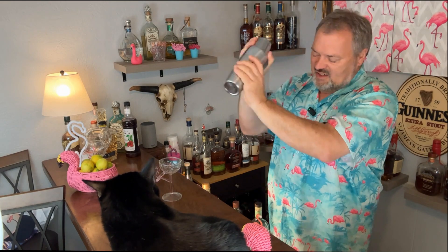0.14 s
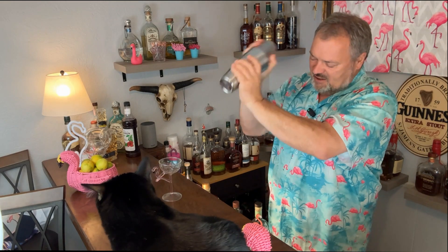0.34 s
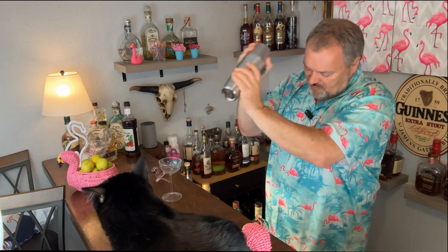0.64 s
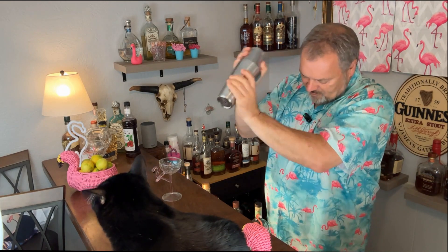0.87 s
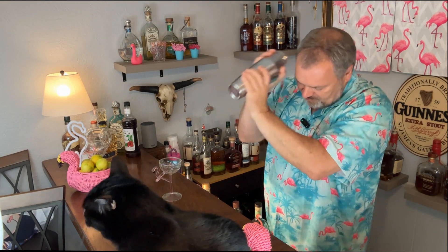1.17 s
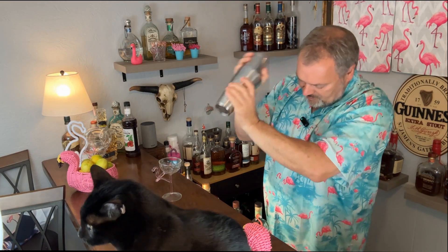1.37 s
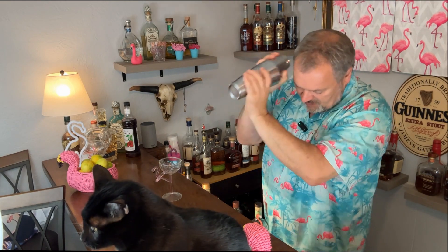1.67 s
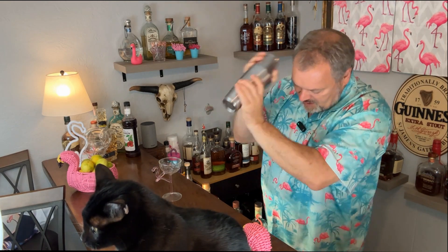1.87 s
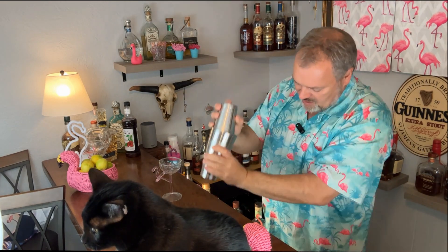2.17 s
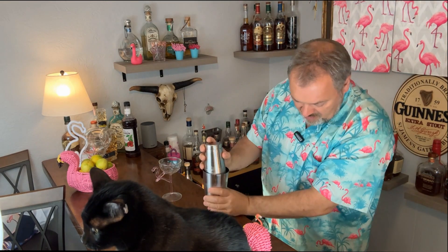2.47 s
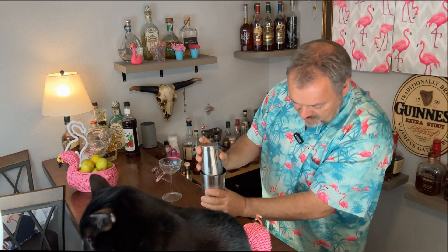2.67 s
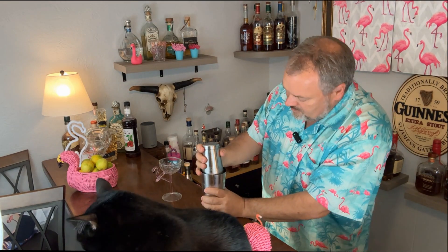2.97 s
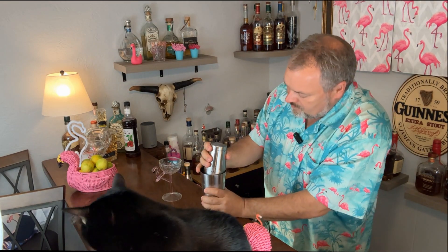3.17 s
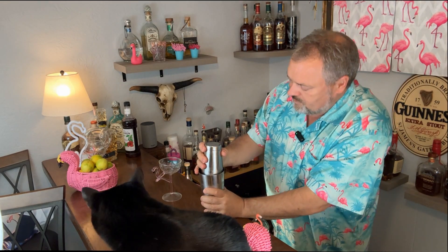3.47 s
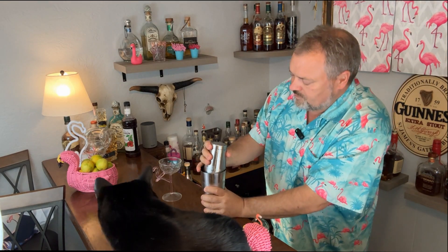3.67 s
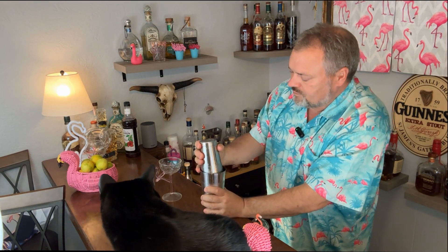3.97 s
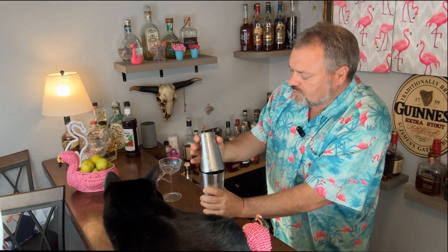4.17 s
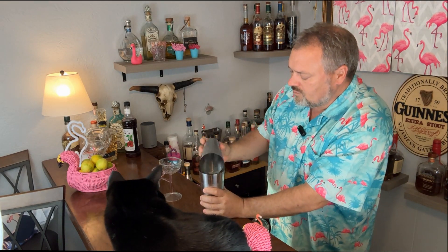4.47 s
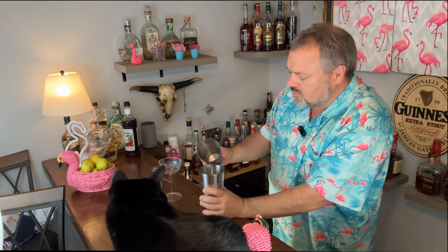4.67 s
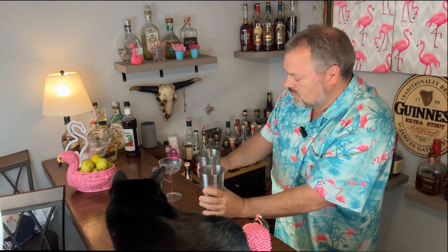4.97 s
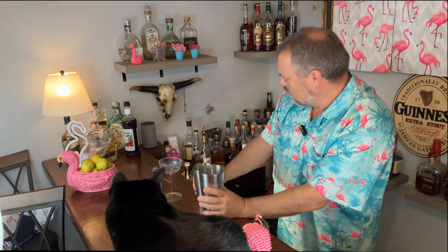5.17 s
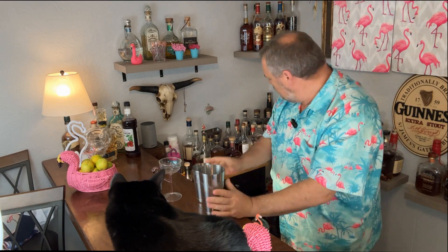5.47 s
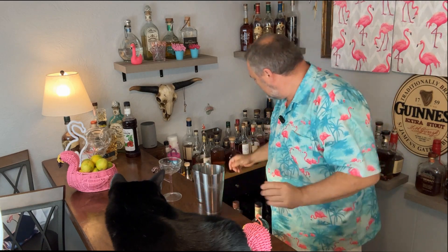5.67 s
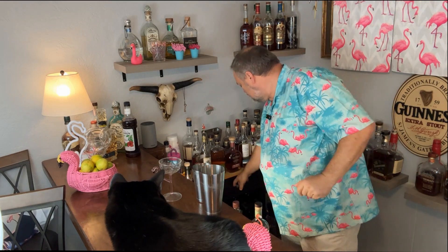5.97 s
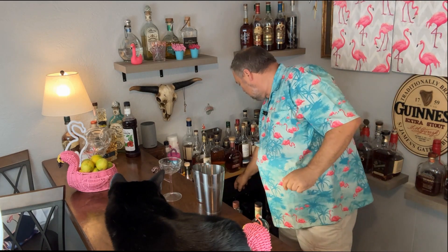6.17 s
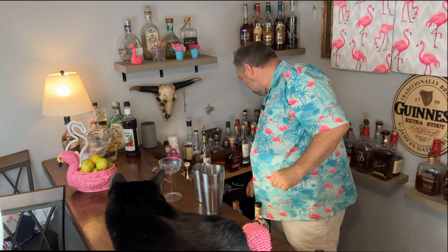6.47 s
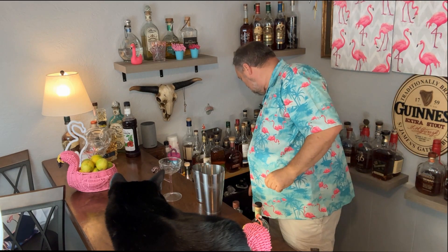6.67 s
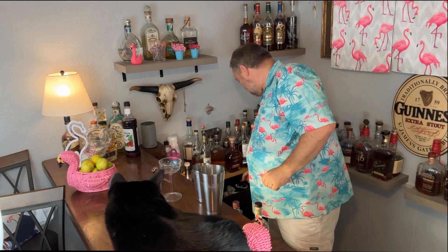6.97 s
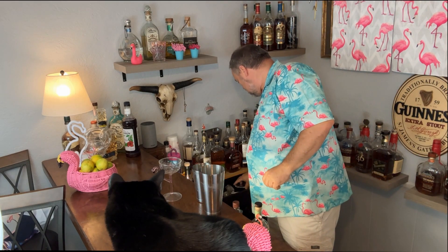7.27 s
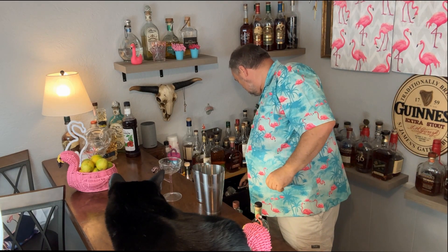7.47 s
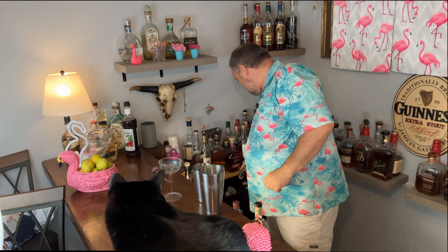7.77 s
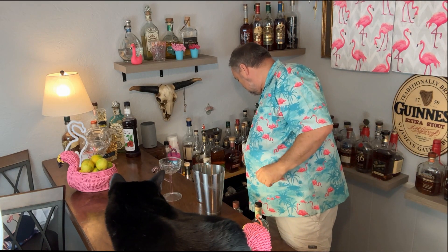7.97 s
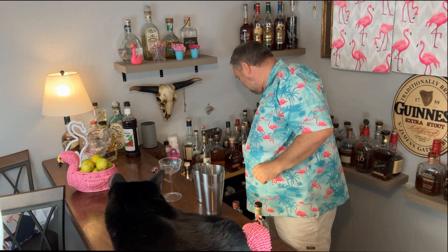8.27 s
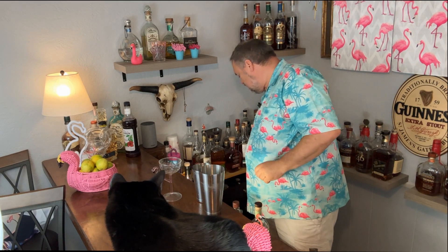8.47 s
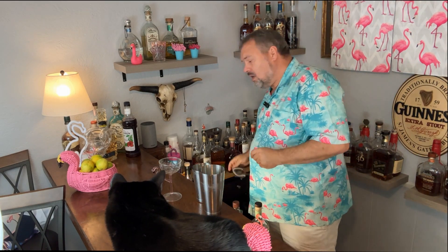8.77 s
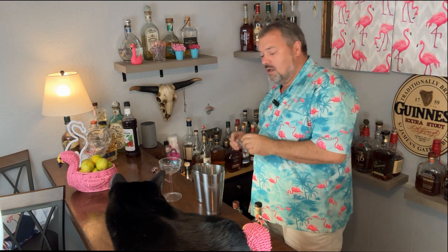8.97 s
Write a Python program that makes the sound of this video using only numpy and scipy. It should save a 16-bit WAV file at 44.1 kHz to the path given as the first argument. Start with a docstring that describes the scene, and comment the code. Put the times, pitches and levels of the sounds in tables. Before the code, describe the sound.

Close in a small, fairly dry room, ice and liquid slam back and forth inside a steel cocktail shaker. It stops with a heavy thud on a wooden bar, gets a dull slap, and is pried open with short squeaks. The empty tin lands with a hollow clack. After a pause, a drawer of bar tools knocks, jingles and slides shut.

```python
"""A small room with a wooden bar: ice rattles in a steel shaker, close to a clip-on microphone.
Random grains and damped pings make the ice; the shaker is then set on the bar, slapped and pried apart
with dull blows, rim grating and squeaks, and its top tin is put down with a ringing clack.
A drawer of bar tools is pulled open, rummaged through and slid shut: wooden knocks, steel clinks,
rolling and whirring runners. A low rumble and a faint hum lie underneath."""
import sys
import numpy as np
from scipy import signal
from scipy.fft import rfft, irfft, next_fast_len
from scipy.io import wavfile
from scipy.ndimage import uniform_filter1d

SR = 44100
rng = np.random.default_rng(int(sys.argv[2]) if len(sys.argv) > 2 else 0)


def int16_out(signal):
    """Quantize to a 16-bit WAV file."""
    q = np.round(np.clip(np.atleast_2d(signal).T, -1, 1) * 32767)
    wavfile.write(sys.argv[1], SR, q.astype(np.int16))


N = 402191  # length [samples]
AGE = np.arange(SR // 2) / SR  # time since a blow [s]
TOP_HZ = 15500  # band limit

# Hand-damped resonances of the full shaker: (frequency [Hz], level [dB])
TIN = [(790, -3.5), (1620, 1), (3200, -1.5)]
MIDDLE_TIN_HZ = TIN[1][0]
# Colour of ice crackle: (frequency [Hz], relative level [dB per Hz])
CRACKLE = [(100, -31.5), (300, -11.5), (700, -5.5), (1200, -6), (1720, 0), (2200, -2), (3100, -7),
           (4500, -8), (6500, -14), (12000, -23), (15500, -30)]
# Resonances that single chips sound: (frequency [Hz], width [Hz], level [dB])
CHIPS = [(850, 470, 0), (1670, 390, 4.5), (3270, 520, 0.5)]
# Vigour of the shaking: (time [s], crackle level [dB])
VIGOUR = [(0, -54.5), (0.25, -54), (0.85, -56), (1.799, -53), (2.1, -57), (2.351, -59), (2.481, -71.5),
          (2.529, -81)]
# The ice lands in the far or the near end, mostly by turns:
# (start [s], half length [s], level [dB], resonance [Hz], middle tin resonance re that [dB])
STROKES = [(0.087, 0.014, -44.5, 3440, 4.5), (0.191, 0.0098, -39.5, 745, -1),
           (0.333, 0.01, -39, 3230, -0.5), (0.427, 0.032, -45.5, 774, -9), (0.565, 0.031, -53.5, 2960, 3.5),
           (0.69, 0.0097, -38.5, 856, -2), (0.803, 0.0091, -38, 3030, -1.5),
           (0.912, 0.013, -43.5, 590, -2.5), (1.032, 0.019, -41.5, 3330, -3),
           (1.145, 0.013, -44.5, 786, -19), (1.277, 0.019, -45, 2840, -3), (1.391, 0.024, -58, 646, -13),
           (1.517, 0.014, -49, 2970, -7), (1.753, 0.013, -48, 3060, 0), (2.006, 0.013, -38.5, 3080, 3),
           (2.119, 0.014, -40.5, 580, 1), (2.251, 0.0085, -48, 3080, -16)]
# Crackle re the stroke: far end [dB], near end [dB]
END_CRACKLE_DB = [-12.5, -22.5]
# The ice also rattles and slides along the wall, during and between landings:
# (middle [s], half length [s], level [dB], resonance [Hz])
SLIDES = [(0.026, 0.0088, -49.5, 830), (0.096, 0.012, -38.5, 2505), (0.15, 0.059, -45.5, 3240),
          (0.365, 0.03, -39.5, 3260), (0.438, 0.042, -46.5, 3200), (0.614, 0.025, -47.5, 3120),
          (0.966, 0.031, -52, 870), (1.515, 0.0083, -52, 5370)]
# Crushed ice sprays against the bare wall: (start [s], length [s], level [dB])
SPRAYS = [(.185, 0.016, -59.5), (.32, 0.015, -46.5), (.775, 0.039, -67), (2.002, 0.016, -48.5)]
# Resonances of the shaker's steel wall: (frequency [Hz], width [Hz], level [dB])
WALL = [(4700, 500, 4), (6040, 230, -2), (7700, 600, 4.5), (9600, 370, 5), (10300, 800, 2),
        (13800, 1000, -13)]
# Whole cubes hit the steel; the moving liquid shifts the resonance that answers:
# (time [s], peak level [dB], resonance [Hz])
CUBES = [(0.089, -30.5, 3390), (.107, -32.5, 3360), (.198, -36, 750), (.319, -31, 3080), (.336, -22, 3300),
         (0.344, -24, 2990), (0.358, -31, 3240), (0.374, -26, 3150), (0.375, -30, 1580), (0.429, -30, 3170),
         (0.568, -36.5, 3070), (0.6, -40, 3200), (.618, -35.5, 3170), (0.692, -28, 890), (.705, -32, 840),
         (0.776, -38, 1700), (.788, -36.5, 3360), (0.809, -30.5, 3230), (.816, -25, 1690), (.925, -36, 628),
         (1.013, -37, 1720), (1.035, -33.5, 1700), (1.048, -42, 3370), (1.063, -39, 5320),
         (1.065, -38, 1710), (1.081, -36, 3080), (1.08, -42, 5250), (1.093, -44, 5200), (1.146, -36, 801),
         (1.257, -41, 1740), (1.52, -37.5, 1830), (1.555, -39, 1626), (1.752, -39.5, 980),
         (2.003, -29.5, 1680), (2.011, -27.5, 1663), (2.027, -27, 1516), (2.119, -33.5, 640),
         (2.14, -34, 612), (2.252, -43, 1780), (3.223, -38.5, 2420), (3.235, -42.5, 1800),
         (3.241, -43, 2340)]
ROLL_DB, MASS_DB = -3.5, -2.5  # rolling ice re the stroke; trim on its blur of small ice
# Rebounding hits in the rolling ice: mean gap, level re the rolling, time to the swell's peak
REBOUND_S, REBOUND_DB, REBOUND_RISE_S = .007, 4.5, .0009
# A cube hit: time to its peak, share in the tin's resonances, share in the wall
CUBE_RISE_S, CUBE_BLEED_DB, CUBE_CHIP_DB = 0.0014, -19, -36

# Dull blows on the full shaker: (time [s], level [dB], click re that [dB], bar top re that [dB])
THUMPS = [(2.532, -19, -61.5, -9), (2.539, -16.5, -65, -3.5), (2.555, -22.5, -59, -17),
          (2.57, -25.5, -55, -25), (2.582, -32, -41, -12.5), (3.228, -32, -24, -24),
          (3.235, -33, -27.5, -5), (3.705, -53.5, -27.5, -8), (3.747, -45, -9.5, -12),
          (5.105, -48.5, -40.5, -31), (5.121, -41, -41, -18)]
# Modes of the loaded bar top: (frequency [Hz], level [dB], t60 [s])
BAR = [(131, 0, .17), (160, -6, .14), (224, -4, .15), (263, -6, .14), (340, -6, .12), (428, 1.5, .11),
       (670, -13, .09), (790, -13, .09), (889, -15, .08)]
# Colour of the thud: (frequency [Hz], relative level [dB per Hz])
THUD = [(50, -37), (100, -9), (150, -1.5), (440, -13), (600, -16.5), (900, -19.5), (1300, -41), (2000, -50),
        (3200, -57), (5000, -88.5)]

# Rim rubs on rim and squeaks:
# (start [s], length [s], grating level [dB], squeak level [dB], squeak pitch [Hz])
SCRAPES = [(3.758, 0.01, -62, -53, 1890), (3.967, 0.022, -47, -40.5, 2070),
           (4.181, 0.068, -49.5, -50, 2036), (4.441, 0.02, -60.5, -90, 2320)]
# Resonances of the rims: (frequency [Hz], width [Hz], level [dB])
RIM = [(2520, 110, -1), (3620, 140, 2), (4300, 130, 2), (5270, 110, 0), (5680, 200, 2), (6520, 150, 1),
       (7800, 130, -4), (9350, 300, -6), (10700, 200, -9)]
# Sharp slips of the seal, and faint ringing after them:
# (middle [s], half length [s], level [dB], resonance [Hz])
SLIPS = [(3.946, 0.0024, -34, 2300), (3.958, 0.002, -38, 2620), (3.969, 0.00054, -22.5, 1990),
         (3.971, 0.0018, -42, 1550), (4.07, .05, -76.5, 1950), (4.16, 0.0036, -28.5, 2010),
         (4.164, 0.0042, -32.5, 2097), (4.187, 0.0045, -38, 2100), (4.205, 0.0025, -29.5, 2110),
         (4.225, .025, -52.5, 2360)]
# The freed tin sings as it slides clear and is swung down: (middle [s], half length [s], level [dB])
LIFTS = [(4.515, 0.055, -74), (5.084, 0.028, -81.5)]
# The freed tin's high modes: (frequency [Hz], level re the lift [dB])
FREE_MODES = [(2500, -10), (5350, -11), (5900, 3.5), (6900, -7), (7970, 4), (9450, 3.5)]
# A squeak: shortest half length, then shares of the scrape by which it lengthens and lags
SQUEAK_HALF_S, SQUEAK_SHARE, SQUEAK_LAG = 0.016, 0.35, 0.62

# The empty tin lands and tips flat: (time [s], level [dB], ring re that [dB])
CLACKS = [(5.258, -12, 0), (5.2695, -8, -23.5)]
# Modes of tin and bar top together: (frequency [Hz], level [dB], t60 [s])
EMPTY = [(190, -19, .19), (277, -18, .19), (380, -19, .16), (549, -19, .15), (620, 5, .072), (648, 5, .072),
         (632, -25, .29), (895, -2.5, .115), (1104, -21, .17), (1154, -20, .15), (1620, -23, .16),
         (1684, -12.5, .17), (2058, -29, .15)]
# Colour of the landing: (frequency [Hz], relative level [dB per Hz])
CLACK = [(70, -32), (170, -11), (450, -2), (750, -5.5), (1600, -11.5), (2000, -17), (3000, -27),
         (4200, -37), (5500, -53.5), (12000, -82.5)]
# Faint hollow knocks of the tin, before and after it is freed: (time [s], level [dB])
FAINT_KNOCKS = [(3.318, -63), (3.75, -57), (4.432, -54.5), (4.456, -48.5), (5.127, -56.5)]
# Modes of these faint knocks: (frequency [Hz], level [dB], t60 [s])
FAINT_KNOCK_MODES = [(380, -5, 0.1), (440, -3, .12), (590, -7, 0.15), (733, 1, 0.07), (790, -2, .13),
                     (1160, -12, 0.086), (2340, -19, 0.13)]

# The loudest knocks in the drawer, with the wood resonance at that spot:
# (time [s], level [dB], steel click re that before a common trim [dB], wood resonance [Hz])
KNOCKS = [(6.356, -11, -22, 608), (6.368, -14.5, -18, 892), (6.385, -16.5, -14.5, 270),
          (6.574, -29, -8.5, 645), (6.589, -33, 0.5, 996), (6.721, -24, -24.5, 664),
          (6.736, -10.5, -8.5, 610), (6.75, -17, -10, 390), (6.872, -29, -31, 560),
          (7.221, -40.5, -41, 487), (7.252, -26.5, -3, 637), (7.264, -22, -29, 593), (7.284, -17, -9, 570),
          (7.313, -14.5, -23, 576), (7.325, -15.5, -28, 415), (7.365, -17.5, -10.5, 443),
          (7.389, -10, -15.5, 612), (7.402, -14, -5.5, 713), (7.426, -16.5, -11, 431),
          (7.447, -16.5, -11, 415), (7.523, -23.5, -10.5, 570), (7.564, -18, -17.5, 636),
          (7.614, -23.5, -19, 596), (7.667, -27.5, -41, 587), (7.712, -26.5, -12, 674),
          (7.755, -25.5, -14, 1236), (7.785, -14, -27, 590), (7.881, -10.5, -29, 650),
          (7.889, -8, -17, 541), (7.911, -17.5, -13, 560), (7.943, -16, -10.5, 512), (7.961, -16, -10, 429),
          (8.333, -38, -33, 1026), (8.355, -33, -37, 518), (8.778, -26, -46, 633), (8.873, -30, -50, 576)]
# Colour of the drawer box: (frequency [Hz], relative level [dB per Hz])
WOOD = [(150, -47), (290, -6), (410, 10), (610, 11), (780, 1.5), (1050, -7.5), (1600, -6.5), (2200, -11),
        (3000, -18.5), (4500, -24), (8000, -66.5)]
# Resonances of its panels: (frequency [Hz], width [Hz], level [dB])
BOX = [(425, 56, 1.5), (585, 40, 7), (701, 35, -6), (882, 40, -6), (1005, 45, -2)]
# Colour of a steel click: (frequency [Hz], relative level [dB per Hz])
CLICK = [(1200, -8.5), (3000, 5), (4500, 2.5), (6500, 0), (9000, -3.5), (13500, -9), (16000, -23.5)]
# Short resonances of the tools: (frequency [Hz], width [Hz], level [dB])
STEEL = [(2876, 630, 7.5), (3170, 180, 3), (3665, 200, 3.5), (4670, 210, -4.5), (6140, 190, 3),
         (6700, 310, 1.5), (7350, 150, -3.5), (9650, 114, -9), (10170, 190, -8.5)]
# The drawer or the hand sets the tools moving:
# (start [s], length [s], rolling level [dB], jingle level [dB])
JOSTLES = [(6.32, 0.088, -35, -47.5), (6.435, 0.42, -46, -78), (6.581, 0.021, -32.5, -43.5),
           (6.738, 0.03, -29.5, -35.5), (7.26, 0.19, -36, -41), (7.459, 0.16, -39, -53.5),
           (7.711, 0.098, -39, -52), (7.89, 0.083, -30, -42.5), (8.285, 0.41, -66, -95.5),
           (8.328, 0.037, -55.5, -87), (8.78, 0.13, -45, -88)]
# The box rumbles as the drawer moves: (middle [s], half length [s], level [dB], resonance [Hz])
BOX_RUMBLES = [(6.385, 0.023, -30.5, 242), (6.46, 0.045, -47.5, 245), (7.41, 0.038, -39.5, 286),
               (7.935, 0.041, -43.5, 249), (8.82, 0.024, -38.5, 270), (8.885, 0.01, -39, 277)]
# The runners whirr, then rasp near the stop: (start [s], length [s], whirr level [dB], rasp level [dB])
GLIDES = [(6.453, 0.1, -54.5, -76), (8.478, 0.057, -59, -85), (8.545, 0.061, -52.5, -84),
          (8.639, 0.055, -58, -80.5), (8.785, 0.033, -56.5, -53), (8.865, 0.06, -66, -59.5),
          (8.966, 0.056, -78.5, -72)]
# Colour of the whirr: (frequency [Hz], relative level [dB per Hz])
WHIRR = [(300, -33), (600, 18.5), (800, 5), (1050, 17.5), (1400, 12), (1800, -29), (3000, -38.5),
         (5000, -63.5)]
# Resonances of the steel rails: (frequency [Hz], width [Hz], level [dB])
RAILS = [(1620, 340, 10), (2220, 250, 4), (2900, 150, 5), (3280, 150, -4), (4460, 450, -3),
         (6300, 600, -13)]
# Steel tools ring out: (time [s], level before a common trim [dB], pitch [Hz], t60 [s])
CLINKS = [(6.574, -31, 5030, .1), (6.588, -25, 3214, .1), (6.59, -30, 4404, .1), (6.737, -20, 6944, .18),
          (6.737, -25, 6370, .09), (6.74, -35, 9440, .15), (6.588, -36, 9950, .12), (7.284, -27, 2980, .06),
          (7.404, -26, 6300, .07), (7.448, -28, 6632, .17), (7.523, -27, 6290, .05),
          (7.902, -27, 5631, .05), (7.944, -29, 7558, .11), (7.952, -29, 6352, .08)]
# Loose pieces chatter briefly after a jolt: (time [s], level [dB], resonance [Hz], t60 [s])
CHATTERS = [(7.786, -33, 1250, .12), (7.786, -38, 2150, .17), (8.335, -57, 2950, .33),
            (8.41, -68, 7600, .14), (8.686, -49, 1100, .05), (8.686, -58, 3200, .15),
            (8.868, -46, 1900, .13), (9.017, -59, 1700, .2), (9.019, -51, 520, .14)]
SPOT_DB, SPOT_T60_S = -13, 0.072  # wood resonance at the knock: level re the knock, decay
STEEL_VARY_DB, STEEL_DETUNE = 5, .025  # random spread from knock to knock; detune is a ratio
SMALL_KNOCKS_PER_S, SMALL_KNOCK_DB = 12, -6  # chance knocks as tools move; level re rolling, then varied

# Colour of the low rumble: (frequency [Hz], relative level [dB per Hz])
FLOOR = [(8.8, -33.5), (15, 6.5), (44, -4), (93, -16.5), (127, -4.5), (156, -22), (255, -23), (294, -30),
         (742, -35), (810, -35.5), (963, -38), (10300, -49.5), (15000, -54)]
# The shirt tugs at the microphone: (middle [s], half length [s], level [dB], resonance [Hz])
TUGS = [(1.025, 0.011, -48.5, 38.7), (3.775, 0.013, -46, 44.8)]
# Decay of the room: (frequency [Hz], t60 [s])
ROOM = [(120, 0.042), (500, 0.16), (1500, 0.1), (4000, 0.077), (12000, 0.18)]


def tumbling_ice():
    """Chips crackle all the way; the mass of ice rolls into either end, mostly by turns, and rebounds."""
    chips = np.zeros(N)
    for hz, width, db in CHIPS:
        contacts = grains(rate=190, spread_db=4)
        chips += amp(db) * unit(resonate(contacts, [(hz, width, 0)], order=2))
    ticks = unit(colour(grains(rate=380, spread_db=5), CRACKLE))
    slosh = unit(colour(grains(rate=9800, spread_db=4.5), CRACKLE))
    bed = glinting(amp(-4.5) * unit(chips) + amp(-.5) * ticks + amp(-6.5) * slosh, depth_db=4)

    rolls, landings, hits = [], [], np.zeros(N)
    for s, half, db, hz, middle_db in STROKES:
        end = int(hz < MIDDLE_TIN_HZ)  # the near end sounds the low resonance
        roll_db = db + ROLL_DB
        landings.append((s, 2 * half, db + END_CRACKLE_DB[end]))
        rolls.append((s + half, half, roll_db, hz))
        rolls.append((s + half, half, roll_db + middle_db, MIDDLE_TIN_HZ))
        hits += rebounds(s + half, half, roll_db, hz, middle_db)
    for s, half, db, hz in SLIDES:
        hits += rebounds(s, half, db, hz, middle_db=-6)

    vigour = amp(np.interp(np.arange(N) / SR, *np.transpose(VIGOUR), right=-200))
    landing_gain = pushes(landings, rise_db_per_s=903, fall_db_per_s=503)
    crunch = landing_gain * colour(bed, [(900, -16), (1800, 4), (7000, 1)])
    spray_gain = pushes(SPRAYS, rise_db_per_s=596, fall_db_per_s=603)
    spray = spray_gain * unit(resonate(grains(rate=750, spread_db=-2.0), WALL))
    mass = amp(MASS_DB) * swells(rolls + SLIDES, width_hz=110, widening=0.042)
    return (vigour * bed + crunch + mass + spray) * lumpy(rate=130, depth_db=2) + hits


def rebounds(s, half, db, hz, middle_db):
    """Cubes strike one after another, each in the given resonance and the tin's middle one."""
    out = np.zeros(N)
    count = int(4 * half / REBOUND_S) + 1
    chances = np.clip(rng.standard_normal((count, 4)), -1.5, 1.5)
    for k, (shift, size, tune, tune_middle) in enumerate(chances):
        t = (k - (count - 1) / 2 + shift / 4) * REBOUND_S  # from the middle of the run
        hit = ping(hz * (1 + .04 * tune), REBOUND_RISE_S)
        hit += amp(middle_db) * ping(MIDDLE_TIN_HZ * (1 + .05 * tune_middle), REBOUND_RISE_S)
        swell = np.exp(-.5 * (t / half) ** 2)
        add(out, s + t, amp(db + REBOUND_DB + 2 * size) * swell * hit)
    return out


def cubes():
    """Each cube sounds one resonance of the tin strongly, the others faintly, and ticks on the wall."""
    out = np.zeros(N)
    for s, db, hz in CUBES:
        add(out, s, amp(db) * ping(hz, CUBE_RISE_S))
        for mode_hz, mode_db in TIN:
            detuned_hz = mode_hz * np.exp(0.11 * rng.standard_normal())
            add(out, s, amp(db + CUBE_BLEED_DB + mode_db) * ping(detuned_hz, CUBE_RISE_S))
        contact = burst(t60=0.01, snap=2.5, rise=0.00046)[:SR // 20]
        add(out, s, amp(db + CUBE_CHIP_DB) * onset_unit(resonate(contact, WALL)))
    return out


def thumps():
    """The full shaker meets the bar and takes the heel of a hand: bar modes, a thud and a click."""
    out = np.zeros(N)
    for s, db, click_db, bar_db in THUMPS:
        body = amp(bar_db) * ring(BAR, attack=0.0055, vary_db=4.5)
        thud = amp(-5.0) * onset_unit(colour(burst(t60=0.13, snap=2.1, rise=0.00096), THUD))
        click = onset_unit(colour(burst(t60=0.11, snap=0.44, rise=0.00098), CRACKLE))
        add(out, s, amp(db) * (body + thud + amp(click_db) * click))
    return out


def prying():
    """The rims grate, each time at another spot, and squeak as the seal lets go; the freed tin shimmers."""
    grit_colour = [(100, 8.0), (400, 5.5), (1300, -6.0), (3000, 0.0), (6000, 4), (13000, -6.5), (16000, -12.0)]
    grit = unit(colour(grains(rate=3400, spread_db=-5), grit_colour))
    contacts = grains(rate=4200, spread_db=8.0)
    grating, squeak_rows = np.zeros(N), []
    for s, length, db, squeak_db, squeak_hz in SCRAPES:
        rim = [(hz * np.exp(.004 * rng.standard_normal()), width, level + rng.standard_normal())
               for hz, width, level in RIM]
        rub = unit(resonate(contacts, rim, order=2)) + amp(-3.5) * grit
        grating += pushes([(s, length, db)], rise_db_per_s=660.5, fall_db_per_s=498.5) * rub
        squeak_half = SQUEAK_HALF_S + SQUEAK_SHARE * length
        squeak_rows.append((s + SQUEAK_LAG * length, squeak_half, squeak_db, squeak_hz))
    lift_rows = [(s, half, db + mode_db, hz) for s, half, db in LIFTS for hz, mode_db in FREE_MODES]
    singing = swells(lift_rows, width_hz=50, widening=.011)
    squeaks = swells(squeak_rows, width_hz=130, widening=0.06)
    slips = swells(SLIPS, width_hz=120, widening=0.03)
    return glinting(grating, depth_db=5.5) + singing + squeaks + slips


def empty_tin():
    """The tin knocks faintly, then comes down hard; two close base modes beat in a hollow clack."""
    out = np.zeros(N)
    for s, db in FAINT_KNOCKS:
        add(out, s, amp(db) * ring(FAINT_KNOCK_MODES, attack=0.0021, vary_db=5.5))
    for s, db, ring_db in CLACKS:
        add(out, s, amp(db + ring_db) * ring(EMPTY, attack=.002, vary_db=.5))
        impact = onset_unit(colour(burst(t60=0.165, snap=2.5, rise=0.00083), CLACK))
        add(out, s, amp(db - 13.5) * impact)
    return out


def drawer():
    """Tools roll, jingle and knock in a wooden box whenever they are set moving."""
    out = np.zeros(N)
    for s, db, click_db, hz in KNOCKS:
        add(out, s, amp(db) * knock(click_db, hz))
    roll_rows = [(s, length, db) for s, length, db, _ in JOSTLES]
    jingle_rows = [(s, length, db) for s, length, _, db in JOSTLES]
    rolling = pushes(roll_rows, rise_db_per_s=751.5, fall_db_per_s=294.0)
    jingle = pushes(jingle_rows, rise_db_per_s=1103.0, fall_db_per_s=364.5)
    jolts = lumpy(rate=90, depth_db=3.5)
    out += jolts * rolling * unit(wooden(grains(rate=2300, spread_db=0.5)))
    touches = grains(rate=4500, spread_db=4)
    steel = unit(resonate(touches, STEEL, order=2))
    out += jolts * jingle * unit(unit(colour(touches, CLICK)) + amp(-6) * steel)
    out += swells(BOX_RUMBLES, width_hz=78, widening=0.086) + runners()
    for start, length, rolling_db, jingle_db in JOSTLES:
        for place, chance in rng.random((round(length * SMALL_KNOCKS_PER_S), 2)):
            small = knock(jingle_db - rolling_db, rng.uniform(350, 1300))
            add(out, start + place * length, amp(rolling_db + SMALL_KNOCK_DB) * (.5 + chance) * small)
    return out


def knock(click_db, hz):
    """A tool hits the box, which answers with that spot's resonance; short steel modes differ each time."""
    spot = amp(SPOT_DB) * ring([(hz, 0, SPOT_T60_S)], attack=.001, vary_db=0)
    wood = amp(-13) * onset_unit(wooden(burst(t60=0.065, snap=7.4, rise=0.0003)))
    click = onset_unit(colour(burst(t60=0.094, snap=0.69, rise=0.00062), CLICK))
    steel = [(mode_hz * np.exp(STEEL_DETUNE * rng.standard_normal()), width,
              db + STEEL_VARY_DB * rng.standard_normal()) for mode_hz, width, db in STEEL]
    glint = onset_unit(resonate(burst(t60=0.0424, snap=2.9, rise=0.00046), steel, order=2))
    return spot + wood + amp(click_db - 8.0) * (.6 * click + .8 * glint)


def wooden(x):
    """Contacts heard through the drawer box and its ringing panels."""
    return unit(colour(x, WOOD)) + amp(-1.0) * unit(resonate(x, BOX))


def runners():
    """Bearings roll unevenly along the rails and rasp as the drawer closes."""
    whirr_rows = [(s, length, db) for s, length, db, _ in GLIDES]
    rasp_rows = [(s, length, db) for s, length, _, db in GLIDES]
    whirr = pushes(whirr_rows, rise_db_per_s=230, fall_db_per_s=298.5)
    rasp = pushes(rasp_rows, rise_db_per_s=897, fall_db_per_s=328)
    whirr *= unit(colour(grains(rate=4200, spread_db=3.5), WHIRR))
    rasp *= unit(resonate(grains(rate=830, spread_db=-5.5), RAILS, order=2))
    return (whirr + rasp) * lumpy(rate=70, depth_db=2.5)


def clinks():
    """Steel tools that are struck free ring on, one decaying mode per row."""
    out = np.zeros(N)
    for s, db, pitch_hz, t60 in CLINKS:
        add(out, s, amp(db - 12.0) * ring([(pitch_hz, 0, t60)], attack=0.00075, vary_db=1))
    return out


def chatters():
    """A jolted piece settles in a quick, rough run of contacts through one broad resonance."""
    out = np.zeros(N)
    for s, db, hz, t60 in CHATTERS:
        run = resonate(burst(t60, snap=2, rise=.0005), [(hz, 250 + .13 * hz, 0)], order=2)
        decay = amp(-60 * AGE / t60)
        add(out, s, amp(db) * run * np.linalg.norm(decay) / np.linalg.norm(run))
    return out


def background():
    """A low rumble of coloured noise and the faint hum of an appliance, a steady sine."""
    rumble = amp(-67.0) * unit(colour(rng.standard_normal(N), FLOOR))
    hum = amp(-82) * np.sin(2 * np.pi * 121 * np.arange(N) / SR)
    return rumble + hum


def room(x):
    """The walls answer after a short gap; each frequency of the noise tail dies at its own speed."""
    hz, t, z = signal.stft(rng.standard_normal(SR // 2), SR, nperseg=256)
    decay = amp(-60 * t / along(ROOM, hz)[:, None])
    tail = signal.istft(z * decay, SR, nperseg=256)[1]
    tail = np.pad(tail, (SR // 150, 0))
    return signal.fftconvolve(x, tail / np.linalg.norm(tail))[:N]


def grains(rate, spread_db):
    """Tiny contacts at random times, rate a second, of uneven size and either sign."""
    size = amp(spread_db * np.clip(rng.standard_normal(N), -2, 2))
    return (rng.random(N) < rate / SR) * size * rng.choice([-1, 1], N)


def burst(t60, snap, rise):
    """One sharp contact, then a scatter of smaller ones that builds up and dies."""
    x = rng.standard_normal(len(AGE)) * amp(-60 * AGE / t60) * (1 - np.exp(-AGE / rise))
    x[0] += snap
    return x


def ring(modes, attack, vary_db):
    """Decaying (Hz, dB, t60) modes, at new strengths for each blow."""
    tone = np.zeros(len(AGE))
    for k, (hz, db, t60) in enumerate(modes):
        decay = amp(db + vary_db * rng.standard_normal() - 60 * AGE / t60)
        tone += (-1) ** k * decay * np.sin(2 * np.pi * hz * AGE)
    return onset_unit(tone * (1 - np.exp(-AGE / attack)))


def ping(hz, rise):
    """A heavily damped resonance under an envelope that swells to 1 and soon dies."""
    t = AGE[:SR // 20]
    u = t / rise
    return u * np.exp(1 - u) * np.sin(2 * np.pi * (hz * t + rng.random()))


def swells(rows, width_hz, widening):
    """Runs of tiny contacts swell and fade in one resonance each; higher ones are broader."""
    out = np.zeros(N)
    t = AGE - AGE.mean()
    for s, half, db, hz in rows:
        shape = np.exp(-.5 * (t / half) ** 2)
        band = [(hz, width_hz + widening * hz, 0)]
        run = shape * resonate(rng.standard_normal(len(t)), band, order=2)
        run *= amp(db) * np.linalg.norm(shape) / np.linalg.norm(run)
        start = s + t[0]
        add(out, start, run[max(round(-start * SR), 0):])  # drop what falls before time 0
    return out


def pushes(rows, rise_db_per_s, fall_db_per_s):
    """Gain that rises, holds and falls for each (start [s], length [s], level [dB]) row."""
    t = np.arange(N) / SR
    power = np.zeros(N)
    for s, length, db in rows:
        fade_db = rise_db_per_s * np.maximum(s - t, 0)
        fade_db += fall_db_per_s * np.maximum(t - s - length, 0)
        near = fade_db < 100
        power[near] += amp(db - fade_db[near]) ** 2
    return np.sqrt(power)


def lumpy(rate, depth_db):
    """Uneven gain of rms 1 that changes rate times a second."""
    knots = np.clip(rng.standard_normal(N // 20), -1.8, 1.8)
    curve = np.interp(np.arange(N) * rate / SR, np.arange(len(knots)), knots)
    return unit(amp(depth_db * curve))


def glinting(x, depth_db):
    """Loose pieces keep changing their contacts, so narrow resonances come and go."""
    z = signal.stft(x, nperseg=512)[2]
    field = uniform_filter1d(rng.standard_normal(z.shape), size=3, axis=0)  # across frequency
    field = uniform_filter1d(field, size=7, axis=1)  # across time
    gain = unit(amp(depth_db * np.clip(unit(field), -2, 2)))
    return signal.istft(z * gain, nperseg=512)[1][:N]


def resonate(x, modes, order=1):
    """Pass x through (Hz, width Hz, dB) resonances; order 2 has steeper skirts."""
    size = next_fast_len(len(x) + SR // 8)
    f = np.fft.rfftfreq(size, 1 / SR)
    body = 0
    for k, (hz, width, db) in enumerate(modes):
        band = 1j * f * width / (hz * hz - f * f + 1j * f * width)
        body = body + (-1) ** k * amp(db) * band ** order
    return irfft(rfft(x, size) * body, size)[:len(x)]


def colour(x, spectrum):
    """Causal minimum-phase filter with the given (Hz, dB) shape."""
    size = 2 * next_fast_len(len(x) // 2 + SR // 8)
    gain = amp(along(spectrum, np.fft.rfftfreq(size, 1 / SR)))
    cepstrum = irfft(np.log(gain + 1e-6))
    cepstrum[1:size // 2] *= 2  # fold the cepstrum onto positive time
    cepstrum[size // 2 + 1:] = 0
    return irfft(rfft(x, size) * np.exp(rfft(cepstrum)), size)[:len(x)]


def along(points, hz):
    """(Hz, value) points read on a log frequency axis."""
    f, v = np.transpose(points)
    return np.interp(np.log(hz + 1), np.log(f + 1), v)


def amp(db):
    """Decibels to gain."""
    return 10 ** (np.asarray(db) / 20)


def unit(x):
    """Scale to rms 1."""
    return x / np.sqrt(np.mean(x ** 2) + 1e-20)


def onset_unit(x):
    """Scale a blow to rms 1 over its first hundredth of a second."""
    return x / np.sqrt(np.mean(x[:441] ** 2) + 1e-20)


def add(track, s, sound):
    """Mix a sound in at time s [s]."""
    part = track[max(round(s * SR), 0):][:len(sound)]
    part += sound[:len(part)]


def scene():
    """All sources sit almost in the centre; a very faint side signal is added."""
    shaking = tumbling_ice() + cubes()
    handling, tin = thumps() + prying(), empty_tin()
    tools = glinting(drawer(), depth_db=3.0) + clinks() + chatters()
    direct = shaking + handling + tin + tools
    near = background() + swells(TUGS, width_hz=26, widening=.1)
    room_send = amp(-11.0) * shaking + amp(-11) * handling + amp(-10) * tin + amp(-13.5) * tools
    mid = direct + room(room_send) + near
    side = colour(room(direct), [(200, -43.0), (700, -51.0), (3000, -49.5), (12000, -30)])
    return np.array([mid + side, mid - side]) * amp([[-.1], [.1]])  # left, right trim [dB]


def record(dry):
    """A very steep lowpass removes the treble above the band limit."""
    size = next_fast_len(N + SR // 2)
    lowpass = 1 / (1 + (np.fft.rfftfreq(size, 1 / SR) / TOP_HZ) ** 120)
    return irfft(rfft(dry, size) * lowpass, size)[:, :N]


dry = scene()
out = record(dry)
int16_out(out)
```